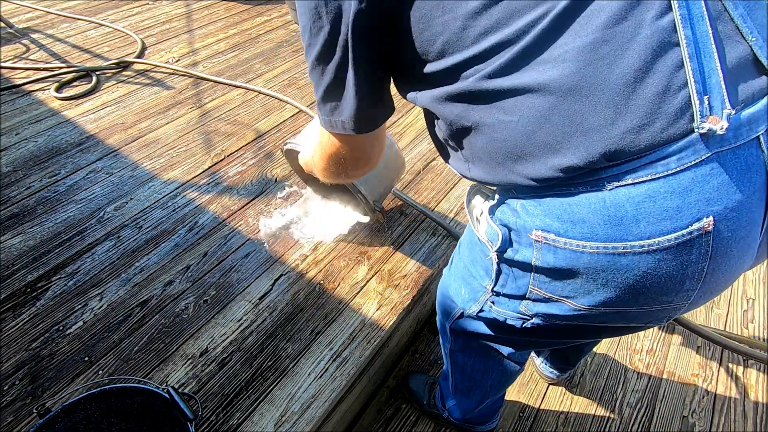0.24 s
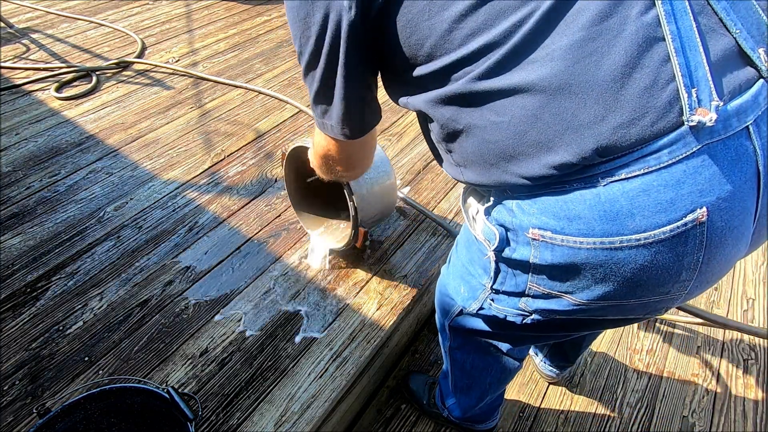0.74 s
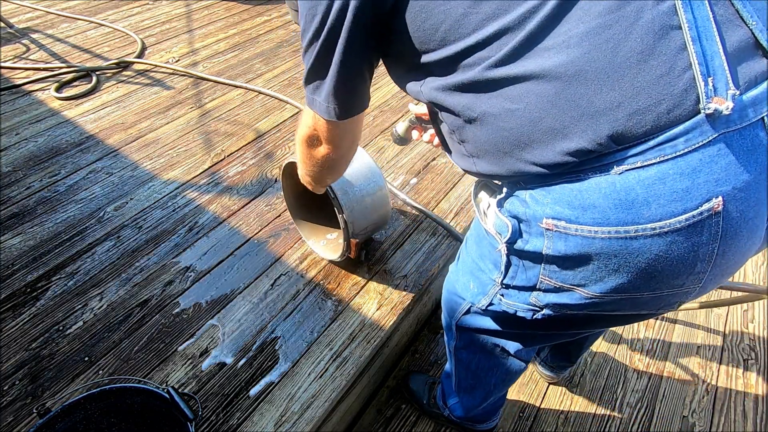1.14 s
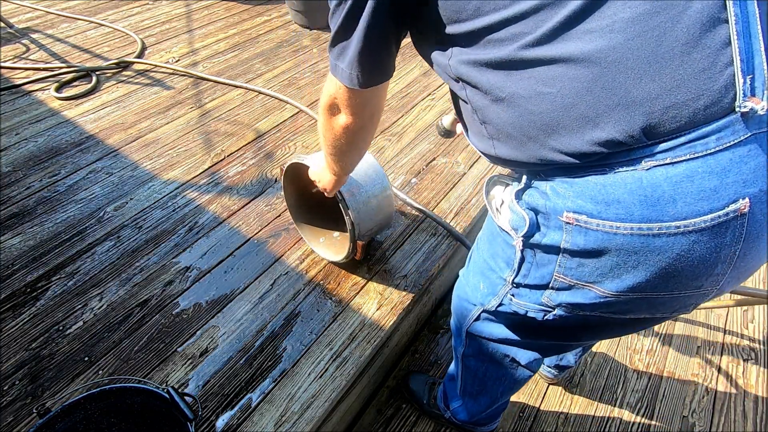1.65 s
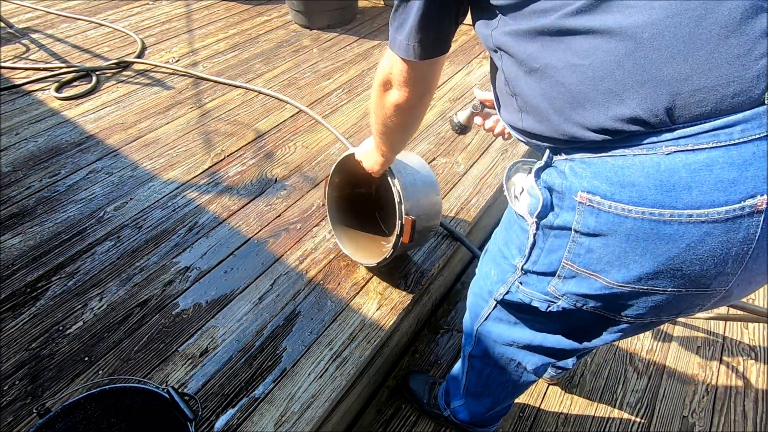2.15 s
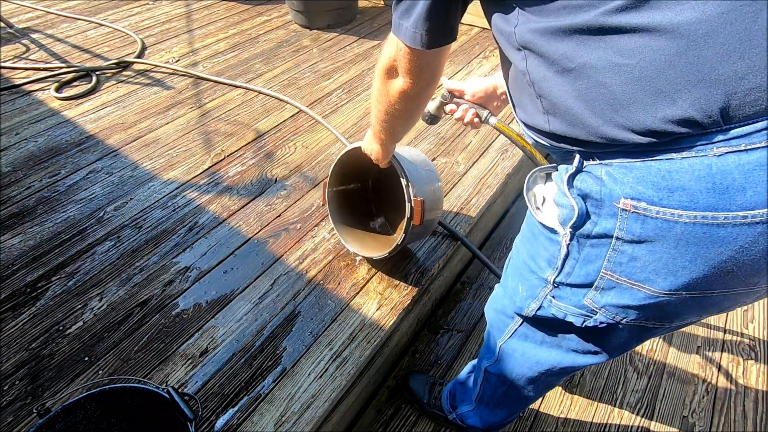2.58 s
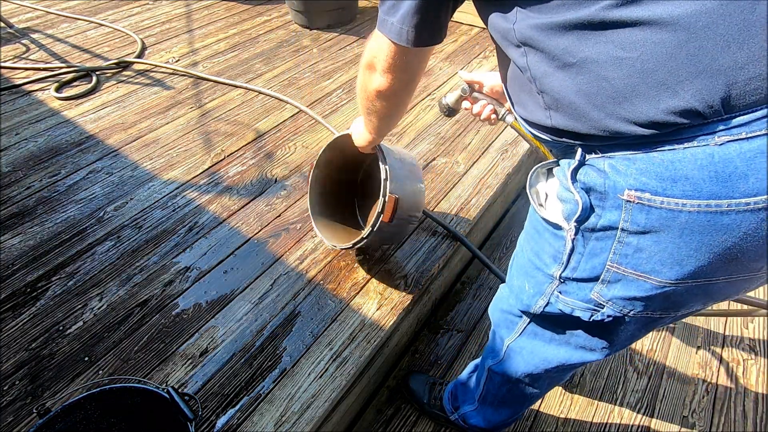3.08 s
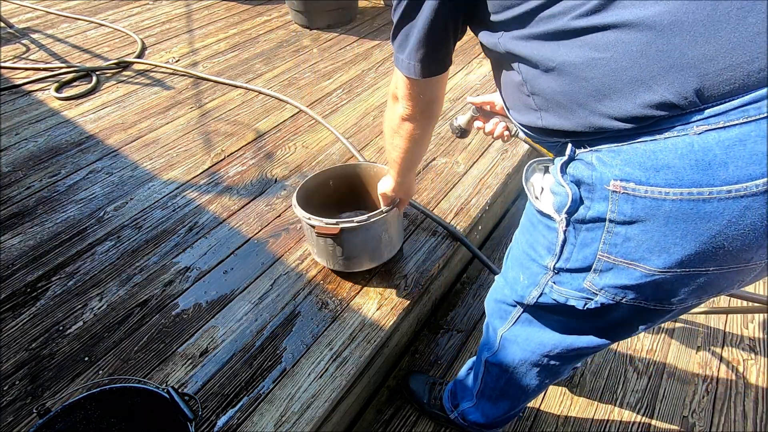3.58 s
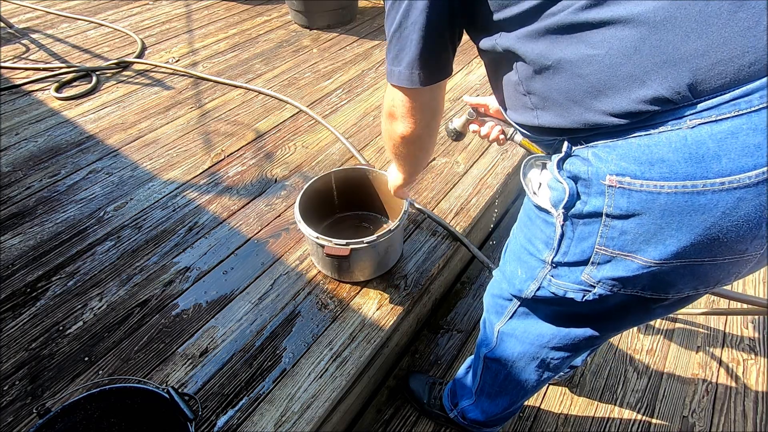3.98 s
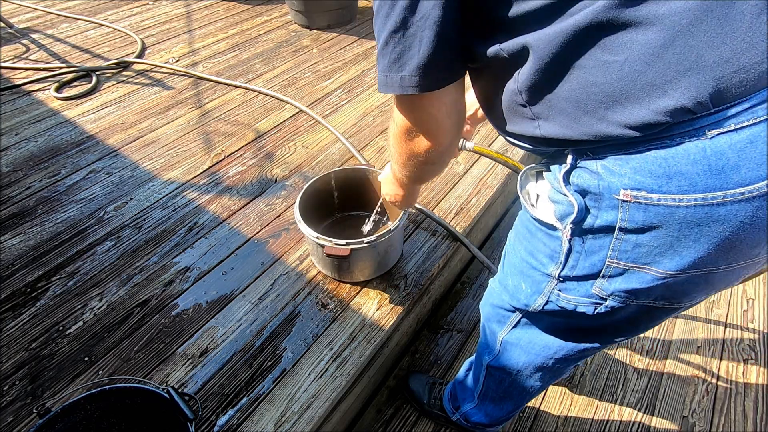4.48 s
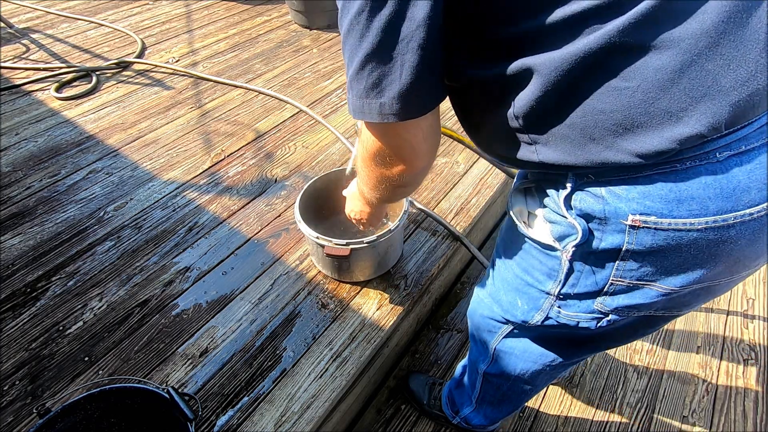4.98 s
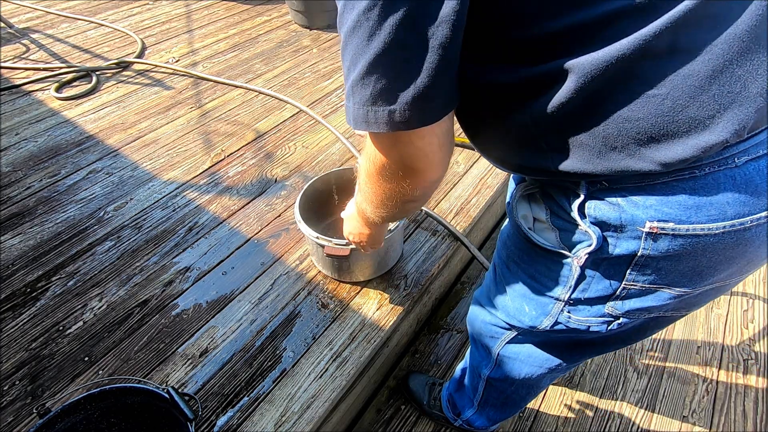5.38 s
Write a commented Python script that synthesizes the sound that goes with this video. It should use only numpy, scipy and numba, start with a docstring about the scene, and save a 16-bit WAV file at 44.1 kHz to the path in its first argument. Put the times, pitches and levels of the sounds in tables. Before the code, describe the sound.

Outdoors on a wooden deck, close to a steel pot, wind buffets the microphone over a faint, distant motor hum; the gusts are strongest in the first two seconds. In the first half second water splashes out onto the boards, then drips and trickles with small bubbly plinks, thinning after about 2 seconds. The pot knocks and the boards thud at around 1.2, 2.2 and 3.5 seconds. Around 3 seconds the rim drags very softly, and two tiny, faint chirps sound, perhaps a bird. At 4 seconds the pot is set down with a louder, bouncing clank and wooden thuds, and its rim keeps humming. From 4.7 seconds a hose rinses the pot: the nozzle hisses, and the jet drums on the wet base, rings the metal wall and scatters as fizzing spray, easing slightly toward the end at about 5.6 seconds.

```python
"""Outdoors on a wooden deck, close to a steel pot; wind buffets the microphone over a far motor hum.
First the pot is emptied: water splashes, drips and trickles over the boards, ringing as small bubbles.
The pot knocks on the deck and boards thud under pot and feet. Around 3 s the rim drags; two faint chirps
sound, perhaps a bird. Near 4 s the pot is set down with a bounce and the rim hums on. From 4.7 s a hose
rinses it: the nozzle hisses, and the jet drums the wet base, rings the wall and scatters as spray."""
import sys
import numpy as np
from scipy import signal
from scipy.fft import rfft, irfft
from scipy.io import wavfile
from scipy.ndimage import uniform_filter1d
from numba import njit

SR = 44100
rng = np.random.default_rng(int(sys.argv[2]) if len(sys.argv) > 2 else 0)


def materialize(psi):
    """Save the field psi as 16-bit PCM at rate SR to the path in sys.argv[1].

    A 1-D psi becomes a single channel; in a 2-D psi each row is a channel.
    """
    bounded = np.clip(np.atleast_2d(psi).T, -1, 1)
    quanta = np.round(bounded * 32767).astype(np.int16)
    wavfile.write(sys.argv[1], SR, quanta)


N = 248283
T = np.arange(N) / SR

# Table levels are relative: each source adds its own gain.
# distant outdoor noise and gusts on the microphone: time_s, level_db
FAR_LEVEL = [(0, -46.5), (.5, -44), (1.13, -43.5), (1.44, -48), (2.37, -52), (3.15, -51.5), (4.06, -49.5),
             (4.5, -56.5), (5.63, -56.5)]
WIND_LEVEL = [(0, -33.5), (.39, -39.5), (.48, -32), (.74, -35), (.8, -45.5), (.92, -31), (1.02, -38),
              (1.29, -38.5), (1.43, -43.5), (1.65, -47), (1.9, -38.5), (1.955, -34), (2.04, -41.5),
              (2.68, -46), (3.28, -44.5), (4.11, -53), (4.3, -52), (5.0, -63), (5.3, -61), (5.63, -54)]
# their spectra: frequency_hz, level_db
FAR_COLOUR = [(71, -54), (120, -23), (147, -5), (212, -15), (271, -15), (332, -14), (530, -19.5),
              (636, -17.5), (863, -17), (1690, -32), (4050, -41.5), (9710, -64), (15500, -82)]
WIND_COLOUR = [(18, -31), (30, 5), (55, 8.5), (80, 1.5), (150, -5.5), (230, -11), (400, -30), (800, -43.5)]
# far motor: pitch_hz, filter_width_hz, level_db
MOTOR_BANDS = [(92.8, 31, -41.5), (204.6, 37.4, -51.5)]
# faint chirps, perhaps a bird: start_s, length_s, start_hz, end_hz, level_db
CHIRPS = [(3.209, 0.028, 2400, 2190, -56), (3.336, 0.028, 2870, 2680, -54)]

# poured water running over the boards: time_s, level_db
TRICKLE_LEVEL = [(0, -60), (.27, -64), (.5, -49), (.66, -55), (.8, -51.5), (1.0, -51), (1.15, -58),
                 (1.3, -50.5), (1.52, -52), (1.63, -57), (1.71, -49), (1.85, -55.5), (2.0, -59.5),
                 (2.4, -60), (2.7, -66.5), (3.62, -62), (4.2, -74.5), (4.69, -62.5)]
# slugs of water landing: peak_s, level_db, rise_s, treble_share_db
SPLASHES = [(0.122, -42.5, 0.032, -31), (0.308, -42, 0.0082, -6.5), (0.421, -45, 0.051, -20)]
# single drops: start_s, level_db, bubble_hz
DROPS = [(.141, -37, 1400), (0.273, -50, 2300), (0.309, -40, 1640), (.3464, -50, 3000), (.354, -42, 4000),
         (0.363, -33, 2310), (.372, -44, 2700), (0.379, -34, 3160), (0.3952, -28, 2180), (.4124, -35, 3530),
         (0.4255, -40, 5900), (.4344, -33, 2120), (.4544, -32, 2000), (0.5197, -38, 3320),
         (0.602, -42, 4800), (.6094, -41, 6300), (0.632, -41, 2290), (0.646, -42, 4000), (0.728, -36, 2420),
         (0.9047, -47, 3600), (0.925, -42, 3330), (1.0785, -37, 4630), (1.278, -38.5, 2610),
         (1.317, -35.5, 2930), (1.3528, -32.5, 4100), (1.3872, -43, 2780), (1.4122, -35, 3370),
         (1.4324, -37, 4860), (1.4615, -26, 4200), (1.5373, -47, 3280), (1.583, -41, 2630),
         (1.64, -38, 3670), (1.6764, -36, 4000), (1.706, -37, 2640), (1.7113, -33.5, 5430),
         (1.7244, -41, 4520), (1.7714, -48, 6190), (1.801, -40, 6060), (1.818, -45, 3300),
         (2.402, -49, 3630), (3.6498, -53, 2940), (4.797, -35, 1720), (4.8997, -21.5, 1707)]
# crisp ticks of spatter: start_s, level_db
TICKS = [(0.3965, -33), (0.471, -38), (0.563, -39), (0.577, -40), (0.728, -40), (1.1533, -43), (1.433, -46),
         (1.8616, -40), (2.2709, -40.5), (2.402, -45), (2.895, -43.5), (3.457, -45), (3.5264, -49),
         (3.578, -42), (3.6044, -46), (3.6197, -49), (3.699, -39.5), (3.8437, -46), (4.594, -47)]

# boards flexing under pot and feet: start_s, joist_db, board_db, push_ms
THUDS = [(1.103, -22.5, -31, 2.3), (1.197, -48, -18, 3.26), (1.215, -32, -18, 3.5),
         (2.240, -67, -19.5, 2.7), (2.262, -19, -16.5, 6.4), (3.518, -51, -12.5, 3.2),
         (3.533, -19, -14.5, 5.8), (3.695, -30, -34, 5.7), (3.881, -29, -29, 1.6), (3.982, -34, -19.5, 1.6),
         (4.009, -16, -20, 4.8), (4.019, -44, -15, 1.5), (4.034, -30, -14.5, 3.1), (4.053, -43, -22, 1.2),
         (4.075, -28, -23, 1.4), (4.092, -33, -25.5, 1.8)]
# modes of the deck: pitch_hz, level_db, t60_s
JOIST_MODES = [(68.4, 8.5, 0.38)]
BOARD_MODES = [(107.3, 1.5, 0.19), (137.2, -16, 0.34), (200, -10.5, 0.16), (316, -14, 0.072),
               (440, -8, 0.031), (477.5, -17.5, 0.29)]
# resonances of the dragging rim: pitch_hz, width_hz, level_db
DRAG_BANDS = [(700, 100, -7), (840, 46, 0)]
# pot against the boards: start_s, base_db, wall_db, hollow_db, contact_ms
KNOCKS = [(1.1875, -55, -45, -65, 0.11), (1.1932, -41, -17, -25, 0.34), (2.237, -46.5, -33.5, -35.5, 0.84),
          (3.519, -47, -25, -16.5, 1.3), (3.9785, -19.5, -33, -25, 0.055), (3.990, -23, -23, -21.5, 0.21),
          (4.0324, -18.5, -30, -18, 0.36), (4.055, -29, -40, -15.5, 1.5), (4.0712, -20.5, -37, -21.5, 0.26),
          (4.0938, -29, -25, -25, .2), (4.111, -34, -49, -44, 0.81), (4.121, -36, -53, -47, 0.28)]
# blows that ring the rim: start_s, level_db
RIM_BLOWS = [(3.98, -24.5), (4.0728, -25), (4.115, -26)]
# modes of the pot, knocked and then wet under the jet: pitch_hz, level_db, t60_s before added damping
BASE_MODES = [(549, -5, 0.12), (764, -18, 0.12), (1060, -8, 0.054), (1150, -6, 0.08), (1317, 6.5, 0.05),
              (1428, -1, 0.035), (1873, 0, 0.06), (2193, 1.5, 0.07), (2718, 2.5, 0.025), (3060, 1.5, 0.09),
              (3305, -10, .05), (3682, -16, 0.15), (3900, -11, 0.04), (4210, -17, 0.07), (4890, -24, 0.05),
              (5500, -30, 0.05), (6492, -27, 0.09), (7840, -28, .05)]
WALL_MODES = [(343.4, -9.5, 0.43), (723, -8, 0.31), (855, -6, 0.082), (1225, -3, 0.17), (2420, -19, 0.36),
              (2542, -13, 0.2), (2570, -13, 0.09), (2900, -15, .1), (3370, -18, 0.17), (3930, -12, 0.066),
              (4300, -24, 0.22)]
HOLLOW_MODES = [(441, -8.5, 0.091), (522, -8, 0.077), (600, -9.5, 0.16)]
WET_BASE_MODES = [(652, 5, 0.11), (736, 4.5, 0.13), (850, 5, 0.097), (1295, -0.5, 0.14), (1408, -4, 0.2),
                  (1575, -10.5, 0.071), (1685, -2, 0.034), (1790, -1, 0.031), (2174, -3, 0.08),
                  (2330, 1.5, 0.043), (2675, -0.5, 0.045), (2810, -3.5, 0.096), (3096, 1.5, 0.065),
                  (3670, 0.5, 0.024), (4100, -8, 0.052), (4810, -3, 0.035)]
WET_WALL_MODES = [(1240, -1, .5), (1970, -2, .3), (2430, 2, .25), (2940, -6, .2), (3790, -3, .15),
                  (4330, -5, .3)]
# phase shift of a mode, opposite at the two microphone ports, at width 1: pitch_hz, phase_rad
PORT_PHASE = [(100, .45), (380, .2), (700, .4), (1290, .5), (2400, .17), (4400, .25), (8000, .5)]

# hose jet, which the rinsing hand crosses now and then: time_s, spray_db, hiss_db, wall_db
JET_LEVELS = [(4.696, -39, -37.5, -60), (4.72, -36.5, -43.5, -63), (4.77, -35, -36, -56),
              (4.85, -36, -40.5, -60), (4.91, -40.5, -46.5, -66), (4.97, -36.5, -43, -60),
              (4.997, -40, -48, -55), (5.012, -36, -39.5, -50), (5.04, -37, -44, -60),
              (5.055, -41.5, -37, -61), (5.08, -38.5, -33, -50), (5.135, -40, -38.5, -41.5),
              (5.21, -44, -40, -49), (5.26, -47, -39.5, -53), (5.315, -56, -45.5, -56),
              (5.35, -36, -37, -54), (5.375, -37, -37.5, -63), (5.42, -37.5, -39.5, -63),
              (5.46, -40.5, -42, -57), (5.495, -49, -47.5, -58), (5.54, -44.5, -48, -59),
              (5.63, -46, -49, -58)]
# the spot that the jet drums: time_s, pitch_hz
SPOT_PITCH = [(4.697, 1250), (4.82, 1950), (4.92, 2050), (5.03, 2900), (5.1, 2510), (5.35, 3000),
              (5.39, 2320), (5.46, 1920), (5.52, 2600), (5.63, 2470)]
HOSE_ON_S = JET_LEVELS[0][0]

# spectra of the close noises: frequency_hz, level_db
WASH_COLOUR = [(1200, -23), (2200, -15), (3000, 3.5), (4500, -9), (7000, -41)]
SLAP_COLOUR = [(600, -20), (1300, 0), (2000, -1), (3200, -18)]
CRACKLE_COLOUR = [(3000, -11.5), (5000, -13.5), (8000, -8.5), (11000, -22), (13000, -15), (15500, -44)]
SPLAT_COLOUR = [(1200, -58), (2500, 9.5), (7000, 2.5), (12000, -16)]
TICK_COLOUR = [(4000, 1), (8000, 4), (15000, -6)]
SPATTER_COLOUR = [(1500, -21), (3500, 4), (9000, -3), (14000, -18)]
RATTLE_COLOUR = [(120, 0), (250, 11), (500, -7), (2500, -12), (5000, -29), (10000, -46), (15000, -64)]
SPRAY_COLOUR = [(1200, -29), (2200, -13), (3000, 10), (4300, 5), (6000, -12)]
NOZZLE_COLOUR = [(3000, -9), (5000, -1), (7500, 4), (10000, 2), (13000, -4), (15700, 4)]


def undb(db):
    """Decibels to gain."""
    return 10 ** (np.asarray(db) / 20)


def unit(x):
    """Scale to rms 1."""
    return x / np.sqrt(np.mean(x ** 2))


def curves(table):
    """Columns of a table joined by straight lines in time."""
    time_s, *columns = np.transpose(table)
    return [np.interp(T, time_s, column) for column in columns]


def at_pitch(hz, points):
    """Read a curve along a log frequency axis."""
    point_hz, values = np.transpose(points)
    return np.interp(np.log(hz), np.log(point_hz), values)


def band(x, hz, width_hz):
    """Two-pole resonance."""
    return signal.lfilter(*signal.iirpeak(hz, hz / width_hz, SR), x)


def butter(x, order, hz, kind):
    """Low-pass or high-pass with a flat passband."""
    return signal.sosfilt(signal.butter(order, hz, kind, fs=SR, output="sos"), x)


def pan(x, db):
    """Set the left side db above the right."""
    return x * undb(np.array([db, -db]) / 2).reshape(2, -1)


def walk(rate_hz):
    """Smooth random wander with standard deviation 1."""
    hold = int(SR / rate_hz)
    steps = np.repeat(rng.standard_normal(N // hold + 1), hold)
    smooth = uniform_filter1d(uniform_filter1d(steps, hold), hold)[:N]
    return smooth / smooth.std()


def noise(colour, spread, flicker_db=0, rate_hz=10):
    """Coloured stereo noise whose bands can flicker separately; spread is side over mid."""
    gain = undb(at_pitch(np.maximum(np.fft.rfftfreq(N, 1 / SR), 1), colour))
    x = irfft(rfft(rng.standard_normal((2, N))) * gain, N)
    if flicker_db:
        low_hz, high_hz = colour[0][0], colour[-1][0]
        centres = low_hz * 2 ** np.arange(.35, np.log2(high_hz / low_hz), .7)
        x = sum(band(x, hz, hz / 2) * undb(flicker_db * walk(rate_hz)) for hz in centres)
    mid, side = x
    return unit(np.array([mid + spread * side, mid - spread * side]))


def pushes(start_s, level_db, contact_ms):
    """Bell-shaped force pulses whose area is the level; softer contact pushes longer."""
    force = np.zeros(N)
    for s, gain, ms in np.broadcast(start_s, undb(level_db), contact_ms):
        pulse = np.hanning(max(int(ms * SR / 1000), 1) + 2)
        force[int(s * SR):int(s * SR) + len(pulse)] += gain * pulse / pulse.sum()
    return force


def burst(start_s, level_db, colour, decay_ms, spread, rise_ms=0):
    """Puffs of coloured noise that start sharply and die exponentially."""
    pole = np.exp(-1000 / (decay_ms * SR))
    return signal.lfilter([1], [1, -pole], pushes(start_s, level_db, rise_ms)) * noise(colour, spread)


def ring(force, modes, damp=1, late_ms=0, width=0, bend=0):
    """Decaying modes; each may start late, differ in phase left and right, and waver in pitch."""
    out = np.zeros((2, N))
    first = np.argmax(force != 0)
    for (hz, db, t60), (late, side) in zip(modes, rng.random((len(modes), 2))):
        pole = np.exp(2j * np.pi * hz / SR - np.log(1000) * damp / (t60 * SR))
        sway = np.exp(2j * np.pi * hz / SR * np.cumsum(bend * walk(8)[first:])) if bend else 1
        tone = sway * signal.lfilter([undb(db)], [1, -pole], force[first:] / sway + 1e-18)
        tone = np.roll(tone, int(late * late_ms * SR / 1000))
        phase = width * np.sign(side - .5) * at_pitch(hz, PORT_PHASE)
        out[:, first:] += (tone * np.exp(1j * phase * np.array([[1], [-1]]))).imag
    return out


def distance():
    """Far outdoor noise, leaning right, and the wavering hum of a far motor."""
    far = noise(FAR_COLOUR, spread=.53, flicker_db=2.3, rate_hz=12) * undb(curves(FAR_LEVEL)[0] + 4)
    hum = sum(undb(db) * unit(band(band(rng.standard_normal(N), hz, width), hz, width))
              for hz, width, db in MOTOR_BANDS)
    return pan(far, -4.5) + hum


def chirps():
    """Two faint, short, falling chirps, perhaps a bird."""
    out = np.zeros(N)
    for start_s, length_s, start_hz, end_hz, db in CHIRPS:
        progress = np.clip((T - start_s) / length_s, 0, 1)
        cycles = length_s * progress * (start_hz + (end_hz - start_hz) * progress / 2)
        out += undb(db) * np.sin(np.pi * progress) * np.sin(2 * np.pi * cycles)
    return out


def wind(calm_db=-41.5):
    """Gusts buffet the microphone ports; above the calm level they strike the right one harder."""
    level_db = curves(WIND_LEVEL)[0]
    lean_db = 2.5 * walk(4) - 1.5 * np.maximum(level_db - calm_db, 0)
    buffeting = noise(WIND_COLOUR, spread=.9, flicker_db=4.3, rate_hz=14)
    return pan(buffeting * undb(level_db + 6.5 + 1.8 * walk(11.27)), lean_db)


@njit
def bubbles(start_s, hz, cycles, left, right, glide):
    """Each bubble is a dying sine whose pitch rises as it nears the surface."""
    out = np.zeros((2, N))
    for k in range(len(start_s)):
        start, life, phase = int(start_s[k] * SR), cycles[k] * SR / hz[k], 0.
        for i in range(min(int(2 * life), N - start)):
            phase += 2 * np.pi * hz[k] * (1 + glide * i / life) / SR
            tone = np.sin(phase) * np.exp(-3 * i / life)
            out[0, start + i] += left[k] * tone
            out[1, start + i] += right[k] * tone
    return out


def fizz(count, start_s, end_s, low_hz, octaves, cycles, scatter_db, tilt_db):
    """A swarm of random bubbles, some louder than the rest; the tilt is per octave."""
    when, pitch, strength, life, side = rng.random((count, 5)).T
    gain = undb(-scatter_db * np.log(1.02 - strength) + tilt_db * octaves * pitch)
    lean = undb(1.5 * side)
    onset_s = start_s + (end_s - start_s) * when
    hz = low_hz * 2 ** (octaves * pitch)
    swarm = bubbles(onset_s, hz, cycles * (.43 + life), gain * lean, gain / lean, glide=.2)
    return unit(swarm) * np.sqrt((end_s - start_s) * SR / N)


def splash_swell(peak_s, db, rise_s, fall_per_rise=1.7):
    """Level of a landing slug of water: a bell-shaped rise and a slower exponential fall."""
    late = (T - peak_s) / rise_s
    return undb(db) * np.where(late < 0, np.exp(-late ** 2), np.exp(-np.maximum(late, 0) / fall_per_rise))


def trickle(flow, splash, treble_flow, seep_db=-65, seep_slap_db=-61):
    """Bubbling wash, low slap and fine crackle on the boards, over a steady seep between them."""
    wash = undb(-8.5) * noise(WASH_COLOUR, spread=.42, flicker_db=5, rate_hz=40)
    wash += undb(-12) * fizz(2500, 0, 4.7, low_hz=2234, octaves=1.45, cycles=11,
                             scatter_db=7, tilt_db=-4.5)
    slap = noise(SLAP_COLOUR, spread=.6, flicker_db=3.5, rate_hz=35)
    crackle = undb(-3) * noise(CRACKLE_COLOUR, spread=.95, flicker_db=3.2, rate_hz=45)
    crackle += undb(-7) * fizz(2500, 0, 4.7, low_hz=3600, octaves=1.4, cycles=20,
                               scatter_db=3, tilt_db=-5)
    wash *= flow + splash + undb(seep_db)
    slap *= undb(.1) * splash + undb(seep_slap_db)
    return wash + slap + treble_flow * crackle


def drops(typical_db=-37.5):
    """Each drop rings a bubble and makes a splat, which grows more slowly with the drop's level."""
    start_s, db, hz = np.transpose(DROPS)
    left, right = pan(undb(db), 1.5 * rng.standard_normal(len(db)))
    plinks = bubbles(start_s, hz, np.full(len(db), 11.), left, right, glide=.092)
    splat_db = -45 + .6 * (db - typical_db)
    return plinks + burst(start_s, splat_db, SPLAT_COLOUR, decay_ms=4.5, spread=.16)


def spatter(flow, count=260):
    """Crisp ticks: a few at set times, many at random and as loud as the water runs."""
    ticks = burst(*np.transpose(TICKS), TICK_COLOUR, decay_ms=1.4, spread=1)
    when, strength = rng.random((count, 2)).T
    start_s = when * HOSE_ON_S
    db = 20 * np.log10(flow[(start_s * SR).astype(int)]) - 4 - 3 * np.log(1 - strength)
    return ticks + burst(start_s, db, SPATTER_COLOUR, decay_ms=2.1, spread=.67)


def deck_scatter(x, tail_db=-33, t60_s=.21):
    """Nearby boards and legs scatter a short tail after each drop."""
    t = T[:SR // 10]
    tail = undb(tail_db - 60 * t / t60_s) * rng.standard_normal((2, len(t)))
    return x + signal.fftconvolve(x, tail, axes=1)[:, :N]


def poured_water():
    """Water lands and runs over the boards until the hose starts; drops and spatter sound on top."""
    flow = undb(curves(TRICKLE_LEVEL)[0])
    splash = sum(splash_swell(s, db, rise) for s, db, rise, _ in SPLASHES)
    treble_flow = flow + sum(splash_swell(s, db + share, rise) for s, db, rise, share in SPLASHES)
    running = trickle(flow, splash, treble_flow) * (T < HOSE_ON_S)
    return running + deck_scatter(drops() + spatter(treble_flow))


def deck_thuds(settle_s=.073):
    """Boards and joist flex under pot and feet; the settling weight stills the joist."""
    start_s, joist_db, board_db, push_ms = np.transpose(THUDS)
    boards = ring(pushes(start_s, board_db, push_ms), BOARD_MODES, width=.74)
    stilled = ring(1. * (T == 0), JOIST_MODES)[0] / (1 + (T / settle_s) ** 4)
    joist = signal.fftconvolve(pushes(start_s, joist_db, push_ms), stilled[:SR // 2])[:N]
    # the thuds carry no deep rumble below about 50 Hz
    return butter(joist + pan(boards, -2.5), 2, 50, "high")


def rim_drag(start_s=2.66, end_s=3.69):
    """The tilted pot's rim rubs unevenly on the boards, in two hollow resonances."""
    pressure = np.sin(np.pi * np.clip((T - start_s) / (end_s - start_s), 0, 1)) ** .5
    rub = sum(undb(db + 2 * walk(22)) * unit(band(rng.standard_normal(N), hz, width))
              for hz, width, db in DRAG_BANDS)
    return undb(-56) * pressure * rub


def pot_knocks(rim_hz=275, rim_t60_s=1.91):
    """Blows ring base, wall and hollow with a short rattle; the rim hums once the pot stands free."""
    start_s, base_db, wall_db, hollow_db, contact_ms = np.transpose(KNOCKS)
    pot = ring(pushes(start_s, base_db, contact_ms), BASE_MODES, damp=1.28, late_ms=2.237, width=.56)
    pot += ring(pushes(start_s, wall_db, contact_ms), WALL_MODES, damp=2.6, late_ms=1.8, width=.67)
    pot += ring(pushes(start_s, hollow_db, contact_ms), HOLLOW_MODES, late_ms=2.42, width=.75)
    rattle_db = np.maximum(base_db, wall_db - 13.5) + 2.5
    rattle = burst(start_s, rattle_db, RATTLE_COLOUR, decay_ms=12, spread=.46, rise_ms=3)
    rim = ring(pushes(*np.transpose(RIM_BLOWS), contact_ms=1), [(rim_hz, 0, rim_t60_s)])
    return butter(pot, 4, 8500, "low") + rattle + rim


def jet_spray(spray_db, hiss_db):
    """The nozzle's fluttering hiss, and spray that washes and fizzes."""
    spray = undb(-9) * noise(SPRAY_COLOUR, spread=.2, flicker_db=2.5, rate_hz=40)
    spray += undb(-1.5) * fizz(900, 4.69, 5.63, low_hz=2090, octaves=1.14, cycles=6.9,
                               scatter_db=2, tilt_db=2.5)
    hiss = noise(NOZZLE_COLOUR, spread=.59, flicker_db=1.7, rate_hz=35)
    flutter_db = 1.7 * (walk(30) + walk(200))
    return undb(spray_db) * spray + undb(hiss_db + flutter_db) * hiss


def jet_on_wall(pelt, wall_db, low_start_s=5.1, low_hz=716, low_t60_s=.14):
    """Drops keep the wall ringing; its lowest tone joins later and sounds to the end."""
    wall = sum(undb(db) * unit(ring(pelt, [(hz, 0, t60)], width=1.57)) for hz, db, t60 in WET_WALL_MODES)
    low_db = -62 + 1.3 * walk(9)
    low_tone = unit(ring(pelt * (T > low_start_s), [(low_hz, 0, low_t60_s)], width=.87))
    return undb(wall_db - 6.5) * wall + undb(low_db) * low_tone


def jet_on_base(pelt, spray_db, cover_s=.25, water_damp=1.55):
    """Drops drum the base; water covers and damps it, and its sloshing bends the modes."""
    since_s = np.maximum(T - HOSE_ON_S, 0)
    bare = np.exp(-(since_s / cover_s) ** 4)
    spot_hz = curves(SPOT_PITCH)[0]
    drum = np.zeros((2, N))
    for hz, db, t60 in WET_BASE_MODES[3:]:
        off_spot_db = -11.5 * np.log2(hz / spot_hz) ** 2  # modes near the spot's pitch sound loudest
        flicker_db = 1.32 * walk(35) + 1.6 * walk(12)
        mode = ring(pelt, [(hz, 0, t60)], water_damp, width=.54, bend=.02)
        drum += undb(db + off_spot_db + flicker_db) * unit(band(mode, hz, hz / 3))
    # the three lowest modes boom until water covers the base
    boom = unit(band(ring(pelt, WET_BASE_MODES[:3], water_damp, width=.82), 690, 330))
    return undb(spray_db - 14 + 8.5 * bare) * drum + undb(-42 - 130 * since_s) * boom


def hose():
    """The jet breaks into drops of uneven force that pelt base and wall and scatter as spray."""
    spray_db, hiss_db, wall_db = curves(JET_LEVELS)
    running = T > HOSE_ON_S
    base_pelt, wall_pelt = running * rng.standard_normal((2, N)) * undb(3.2 * rng.standard_normal((2, N)))
    pot = jet_on_base(base_pelt, spray_db) + jet_on_wall(wall_pelt, wall_db)
    return pot + running * jet_spray(spray_db, hiss_db)


def scene():
    """Everything that reaches the microphone on the deck."""
    background = wind() + distance() + chirps()
    return background + poured_water() + pot_knocks() + deck_thuds() + rim_drag() + hose()


def record(dry):
    """Each microphone port resonates near 10 kHz above a dip; deep bass and top treble are cut."""
    ports = np.array([x + 1.3 * band(x, peak_hz, 330) - .6 * band(x, dip_hz, 1100)
                      for x, peak_hz, dip_hz in zip(dry, (9500, 9800), (8600, 8300))])
    ports = butter(ports, 2, 36, "high")
    ports = butter(ports, 2, 11500, "low")
    return signal.sosfilt(signal.ellip(12, .2, 80, 15600, fs=SR, output="sos"), ports)


dry = scene()
out = record(dry)
materialize(out)
```